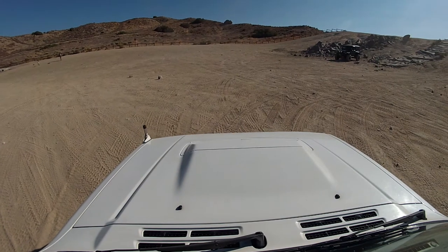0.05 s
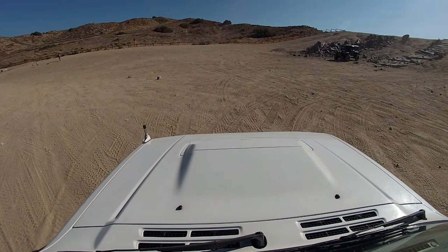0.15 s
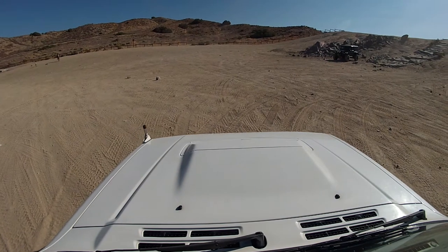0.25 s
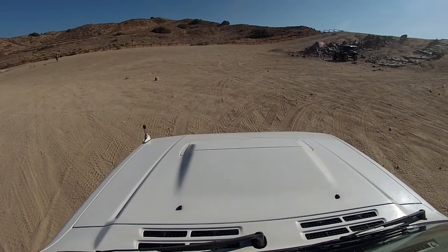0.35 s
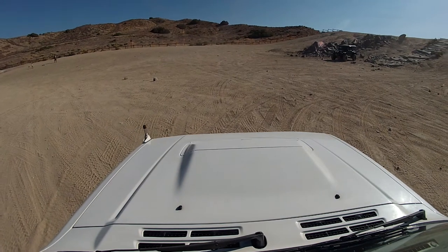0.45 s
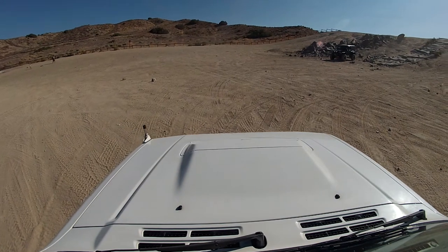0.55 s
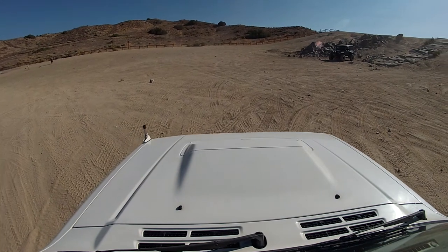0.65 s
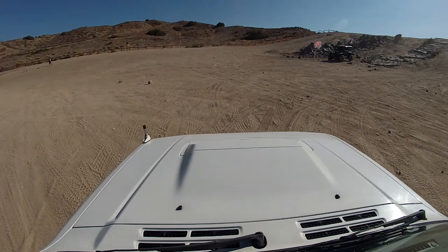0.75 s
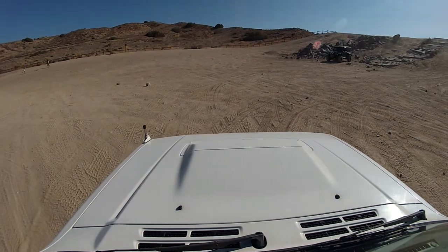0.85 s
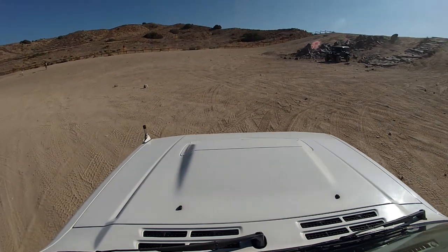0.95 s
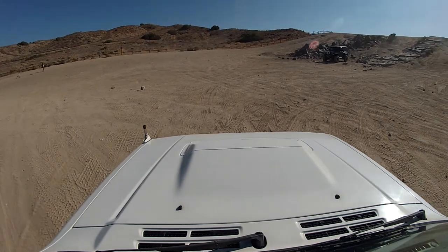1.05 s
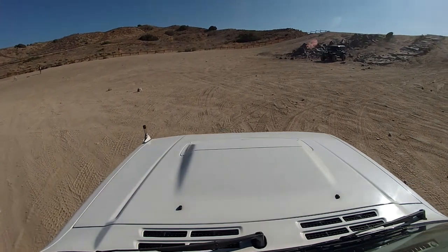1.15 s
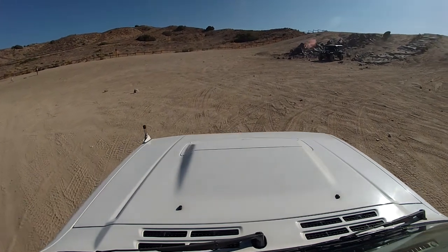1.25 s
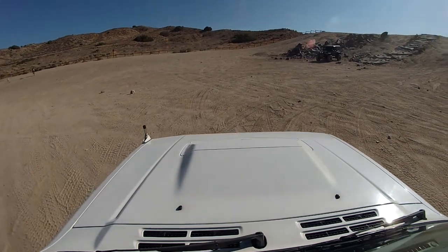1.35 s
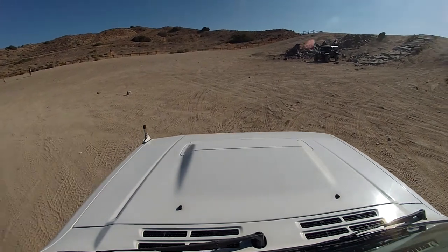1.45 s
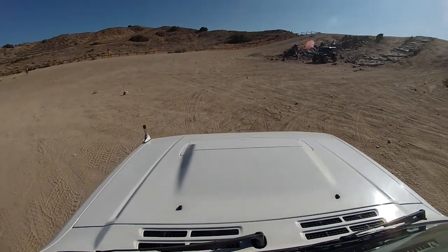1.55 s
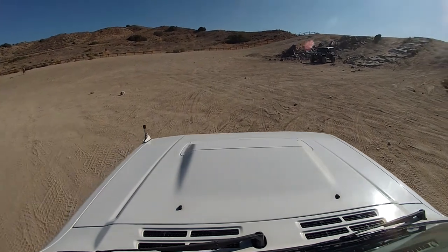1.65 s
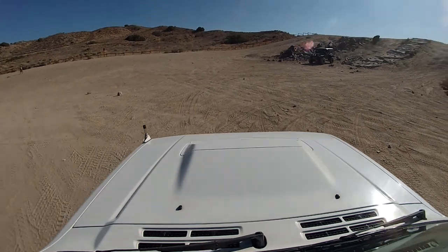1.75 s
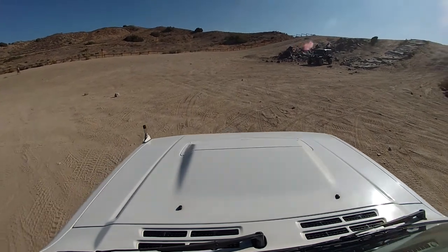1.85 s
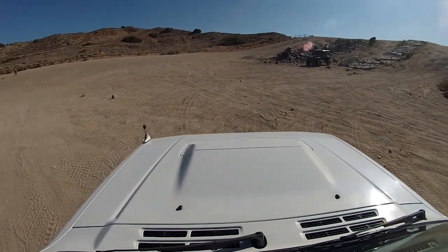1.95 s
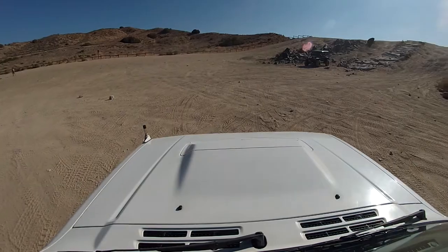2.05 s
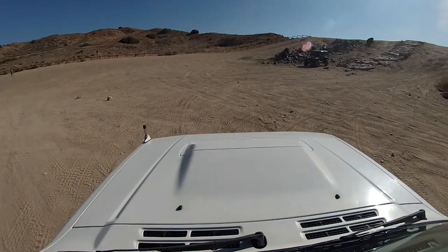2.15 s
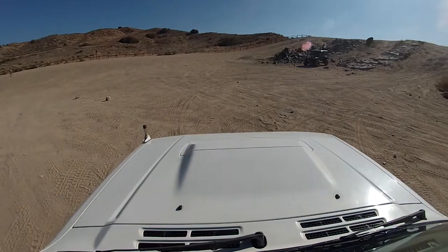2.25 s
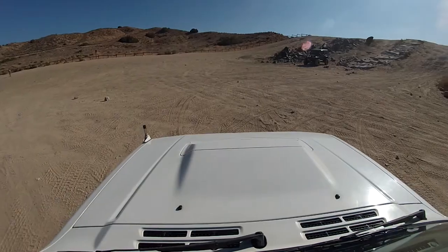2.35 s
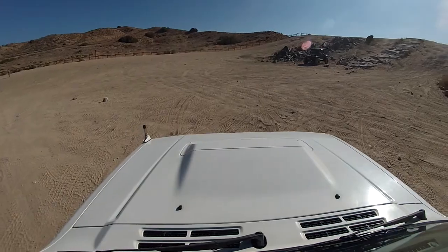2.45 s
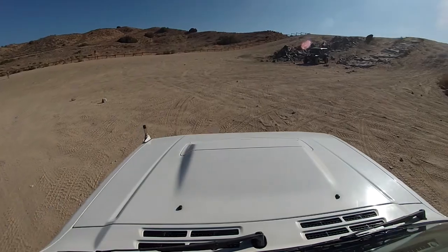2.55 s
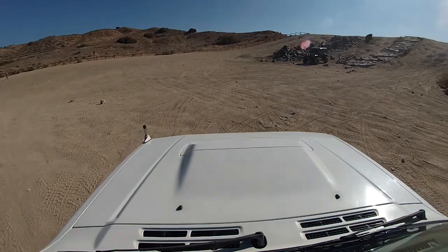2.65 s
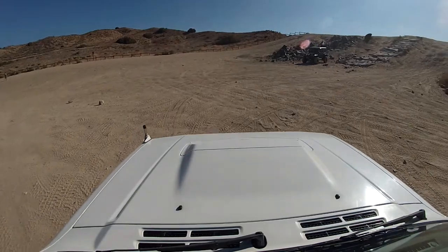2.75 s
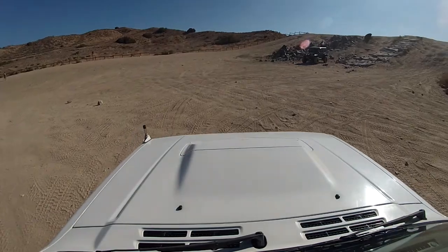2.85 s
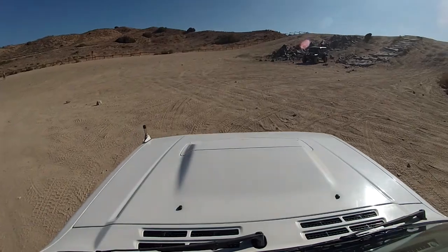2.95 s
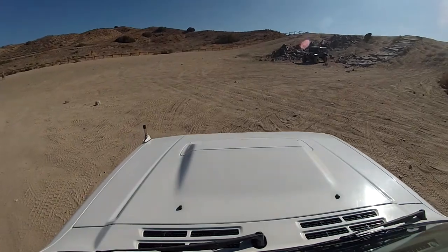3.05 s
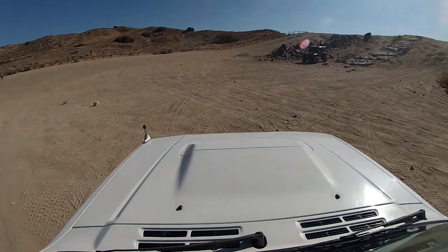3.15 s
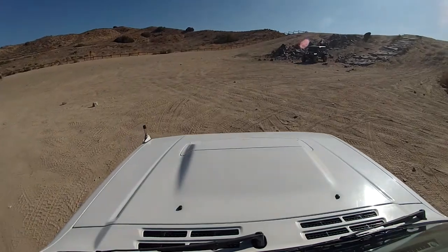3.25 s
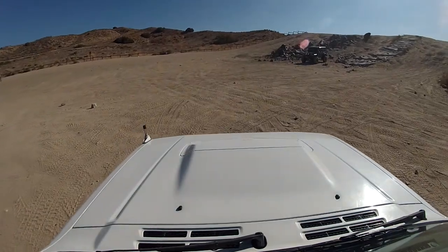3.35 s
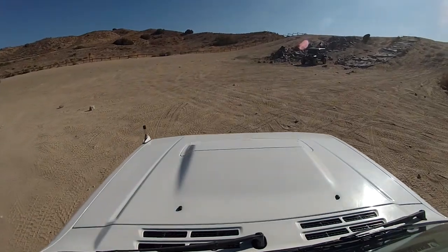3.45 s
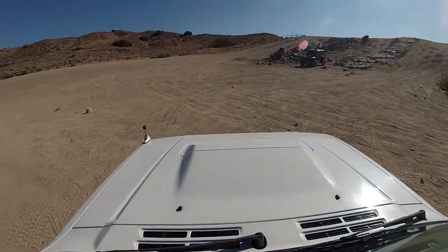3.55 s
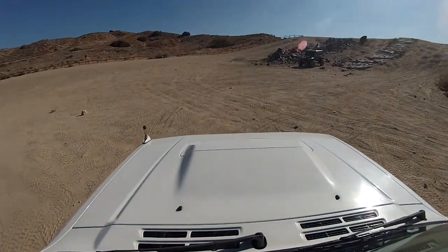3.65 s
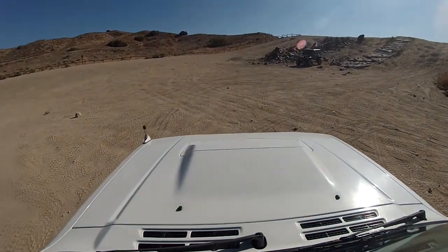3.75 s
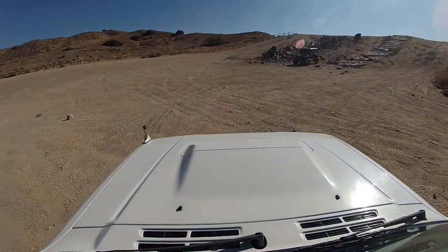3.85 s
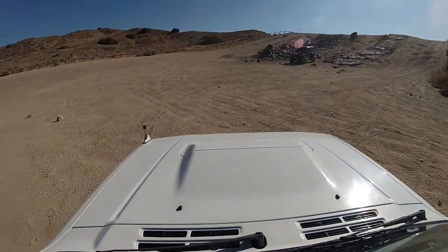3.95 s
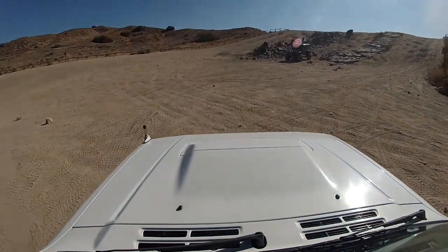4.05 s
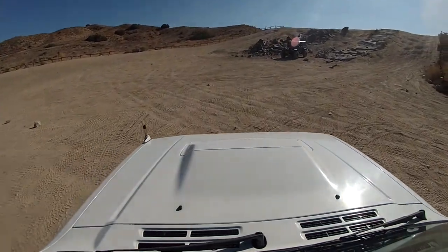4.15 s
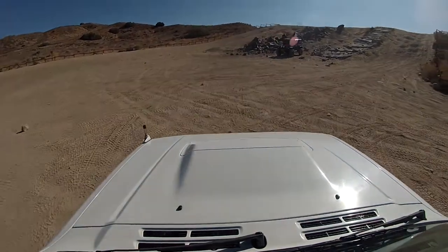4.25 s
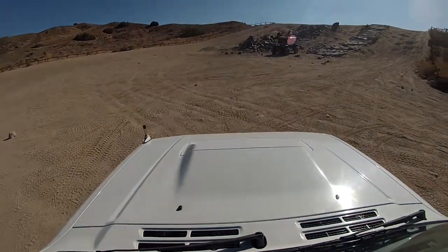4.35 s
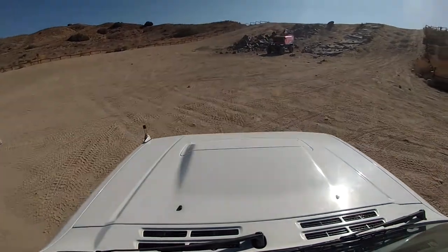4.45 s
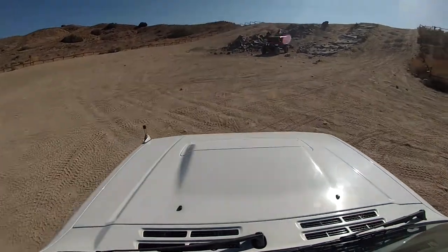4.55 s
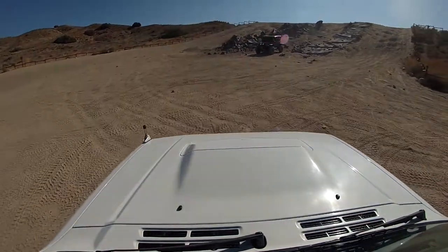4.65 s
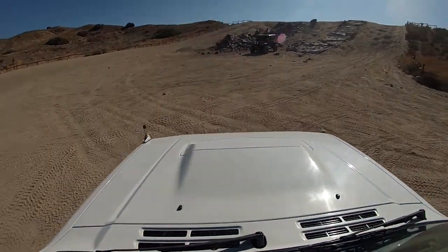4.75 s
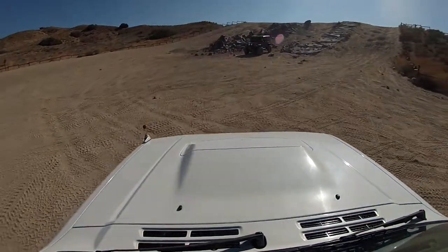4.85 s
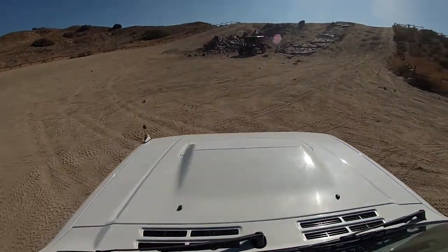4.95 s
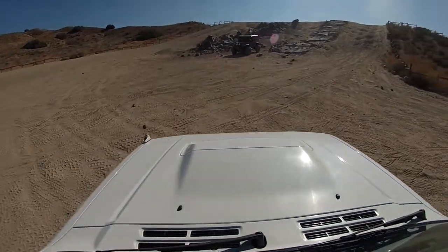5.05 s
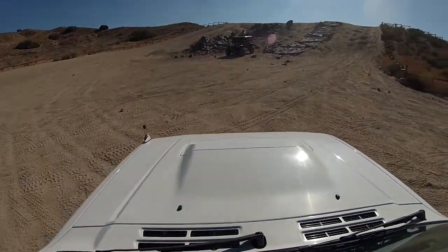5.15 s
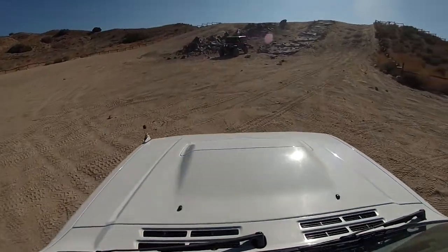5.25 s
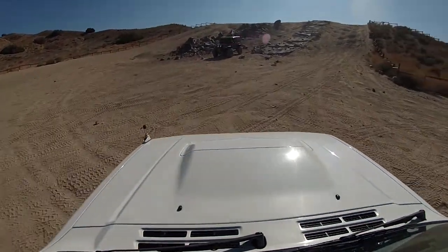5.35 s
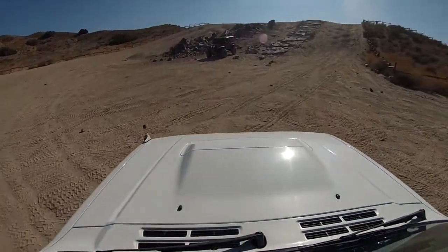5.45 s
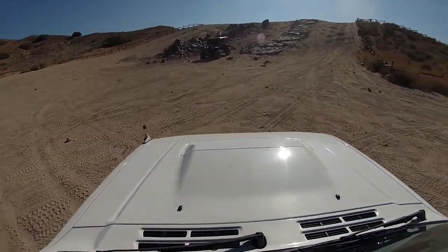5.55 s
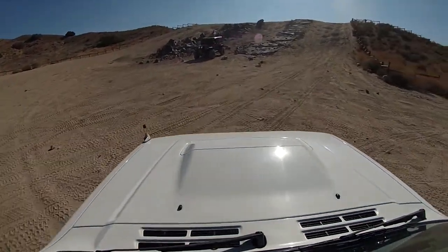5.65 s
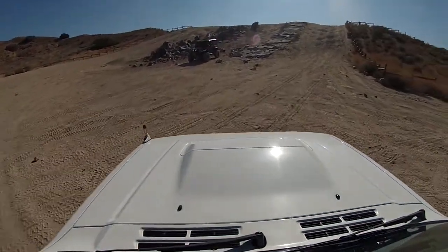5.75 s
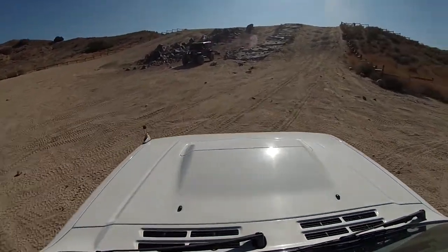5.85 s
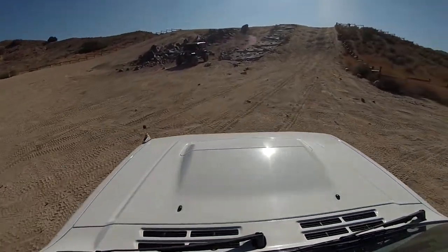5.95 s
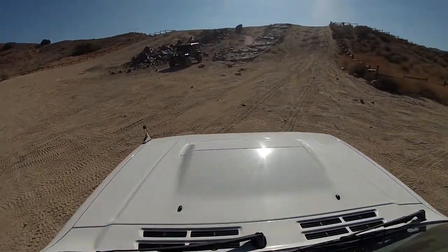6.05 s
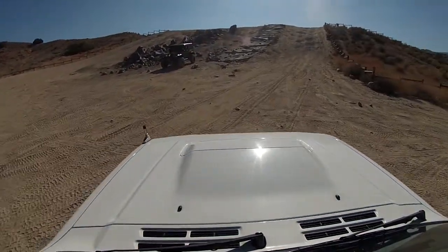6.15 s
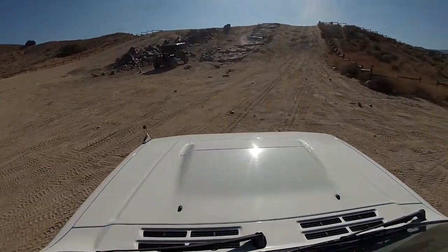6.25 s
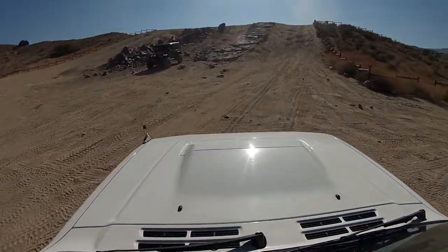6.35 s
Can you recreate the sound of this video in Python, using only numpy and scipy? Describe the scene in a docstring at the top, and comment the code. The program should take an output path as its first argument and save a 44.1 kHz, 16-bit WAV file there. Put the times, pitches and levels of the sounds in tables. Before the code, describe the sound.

Heard from up on a truck outdoors on dirt, a six-cylinder engine idles unevenly and quietly, gives a small blip with a faint intake moan, and settles. Low body thumps and soft tyre rumble follow. Then it revs up sharply with a ticking clack, its exhaust deep and its fan roaring and whining, climbs to a peak, drops in pitch and keeps pulling.

```python
"""A truck engine throbs unevenly at idle, gives one small blip, then revs up and pulls hard.
Around it are a whining, roaring fan, a bright hiss, wind and tyre rumble, thumps, a tick and two thin squeaks.
The six-cylinder exhaust, seven-blade fan and shaking block are sums of tones that follow the engine speed.
Roar, hiss, wind and tyres are coloured noise; the intake moan is a narrow band of noise that rises in pitch.
Squeaks are wavering tones, thumps are short low waves, and the tick is two short bursts of noise."""
import sys
import numpy as np
from scipy import signal
from scipy.fft import rfft, irfft
from scipy.io import wavfile

SR = 44100
rng = np.random.default_rng(int(sys.argv[2]) if len(sys.argv) > 2 else 0)


def store_wav(level_fs):
    """Save 16-bit WAV to argv[1]."""
    pcm = np.round(np.clip(np.atleast_2d(level_fs), -1, 1) * 32767)
    wavfile.write(sys.argv[1], SR, pcm.T.astype(np.int16))


N = 282681
TIME = np.arange(N) / SR  # seconds
BINS = np.fft.rfftfreq(N, 1 / SR)  # Hz

# Engine speed, as the pulse rate of one bank of three cylinders (1.5 pulses per crank turn).
# Each row: time in seconds, rate in Hz.
BANK_RATE = [(0, 16.2), (.57, 16.1), (.89, 23.4), (1.35, 19.8), (1.7, 19.6), (2.75, 15.7), (3.18, 16.1),
             (3.4, 28.1), (3.57, 33.5), (3.76, 42.7), (4.02, 44.1), (4.32, 51.9), (4.63, 56.7),
             (5.42, 62.3), (5.83, 62.7), (6.0, 53.6), (6.21, 44.6), (6.41, 43.9)]
# Load on the engine. Each row: time in seconds, level of the exhaust's firing tone in dB.
FIRING_LEVEL = [(0, -38), (.57, -38.5), (.72, -31.5), (.98, -33), (1.15, -37.5), (1.7, -41.5),
                (2.45, -44.5), (3.13, -39), (3.29, -27), (3.59, -17.5), (3.85, -25), (4.2, -24),
                (4.5, -28.5), (5.45, -24), (5.87, -25), (5.99, -33), (6.3, -23.5), (6.41, -24.5)]
# How unequally the two banks fire. Each row: bank rate in Hz, change of the odd pulse harmonics in dB.
BANK_IMBALANCE = [(16, -6.5), (18, 0), (33, -.5), (45, 1.5), (52, 0.5), (62, -4)]
# Shape of the exhaust pulse. Each row: multiple of the bank rate, relative level in dB.
PULSE_HARMONICS = [(1, -1.5), (3, 3), (4, 0), (5, 1.5), (6, -0.5), (7, -8.5), (8, -4)]
# Exhaust pipe and silencer. Each row: frequency in Hz, gain in dB.
PIPE_GAIN = [(15, -13), (48, -5.5), (60, -4.5), (68, 0), (100, -2), (132, 0), (143, -5), (162, -18),
             (215, -8), (255, -10), (300, -11.5), (600, -24)]
# Resonances of the fan shroud. Each row: frequency in Hz, width in Hz, gain at the centre in dB.
SHROUD_MODES = [(200, 12, 8.5), (264, 25, 4), (473, 50, 2), (568, 74, 8)]
# Colour of the roar at idle and when pulling. Each row: frequency in Hz, relative level in dB per Hz.
ROAR_IDLE_COLOUR = [(82, -48), (140, -24.5), (157, -44), (214, -3.5), (242, -8.5), (286, -2), (318, -10.5),
                    (381, -15), (424, -19.5), (467, -12.5), (648, -18), (873, -15.5), (1180, -23),
                    (1300, -30), (1400, -30), (1820, -74), (3080, -120)]
ROAR_PULL_COLOUR = [(82, -13), (140, -4), (167, -4), (264, -5), (311, -9.5), (428, -12), (524, -10),
                    (623, -15), (706, -10), (816, -12), (925, -13), (1250, -29.5), (1400, -27), (1820, -52),
                    (3080, -120)]
# Panel resonances that colour the roar. Each row: frequency in Hz, width in Hz, gain at the centre in dB.
PANEL_MODES = [(274, 31, 2), (302, 72, -3.5), (388, 117, 3.5), (484, 33, 0.5), (539, 23, 1), (562, 20, 6.5),
               (680, 17, -0.5), (676, 31, 3), (904, 28, 3.5), (1002, 28, 3.5)]
# Colour of the hiss at idle and when pulling. Each row: frequency in Hz, relative level in dB per Hz.
HISS_IDLE_COLOUR = [(710, -1), (1200, -19.5), (1360, -21), (1450, -7.5), (1730, -5), (2510, -15),
                    (2880, -11.5), (3460, -14.5), (3970, -16), (4970, -20.5), (5650, -15), (6350, -23),
                    (12200, -29.5), (13900, -32), (15400, -33)]
HISS_PULL_COLOUR = [(710, -5.5), (1200, -1), (1250, -16), (1640, -5.5), (1780, -4), (2280, -10),
                    (2530, -11.5), (2850, -8), (3350, -12), (3850, -15), (4970, -25), (5650, -21.5),
                    (6490, -32.5), (12500, -39), (15400, -58)]
# Ringing of the engine bay. Each row: frequency in Hz, width in Hz, gain at the centre in dB.
BAY_MODES = [(1780, 43, 2), (2870, 140, 1.5), (3246, 61, 5), (3480, 120, 8), (3900, 470, -5),
             (5670, 270, 2), (11550, 700, -2.5), (14800, 3000, -4)]
# Colour of the wind. Each row: frequency in Hz, relative level in dB per Hz.
WIND_COLOUR = [(4, -25), (12, -3), (22, 0), (32, -4), (50, -10), (80, -15), (130, -18), (300, -35),
               (900, -70)]
# Gusts on the microphone. Each row: peak time in seconds, rise (and fall) in seconds, peak level in dB.
GUSTS = [(0.05, 0.16, -34.5), (.8, 0.48, -44), (3.1, 0.59, -35.5), (3.58, 0.18, -36), (5.6, 0.37, -31.5),
         (6.3, 0.16, -33)]
# Tyres drumming on rough ground. Each row: peak time in seconds, rise (and fall) in seconds, peak level in dB.
ROUGH_GROUND = [(2.4, 0.84, -39.5), (5.2, 0.2, -28)]
# Thin metallic squeaks. Each row: peak time in seconds, rise in seconds, fall in seconds,
# pitch at the peak in Hz, glide in Hz per second, level in dB.
SQUEAKS = [(.45, .09, .1, 1495, -700, -62), (4.2, 0.17, 0.066, 8868, -1.5, -58)]
# The body rocks on a bump. Each row: time in seconds, pitch in Hz, level in dB, length in seconds.
BODY_THUMPS = [(1.845, 25, -24, 0.11), (2.155, 28, -21.5, 0.026), (2.29, 39.7, -32, 0.016),
               (2.803, 30.4, -29.5, 0.07)]
# Sharp ticks. Each row: time in seconds, peak level in dB before it is halved.
TICKS = [(3.592, -43)]
# Colours of the tyres, the dull clack and the sharp snap. Each row: frequency in Hz, relative level in dB.
TYRE_COLOUR = [(15, -26), (35, 0.5), (60, 5.0), (100, 0.5), (140, -5.5), (200, -6.5), (500, -62.0)]
CLACK_COLOUR = [(300, -17), (900, 8), (2000, -1), (4500, -15.0), (7000, -32), (16000, -34)]
SNAP_COLOUR = [(500, -10), (3000, -4), (8000, -10), (15000, -11)]

# bank rates between which the noise colours move from idling to pulling
IDLE_HZ, FULL_HZ = 19.2, 61.04
# the uneven throb under the firing tone: its base level at low load, and the share of the load it follows
LOW_LOAD_DB, THROB_DB, THROB_SHARE = -41, -41.5, 0.63
# level at full speed (dB), growth with each doubling of speed (dB), and the part that always stays (dB)
ROAR_DB, ROAR_GROWTH_DB, ROAR_REST_DB = -26, 11, -50
HISS_DB, HISS_GROWTH_DB, HISS_REST_DB = -40.5, 9.5, -57.5
# fan blade tone and its octave at full speed, before the shroud; growth with each doubling of speed
BLADE_DB, OCTAVE_DB, BLADE_GROWTH_DB, OCTAVE_GROWTH_DB = -37.5, -40, 12.5, 16
BREEZE_DB = -42
# intake moan: start (s), rise (s), fade (dB per second), level before the fade (dB)
MOAN_AT, MOAN_RISE_S, MOAN_FADE_DB_PER_S, MOAN_DB = .68, .09, 24, -43.5
MOAN_SHUT_HZ, MOAN_OPEN_HZ, MOAN_OPEN_S = 188.5, 370, .2
EDGE_HZ = 15350  # top of the treble


def gain_of(db):
    """Turns decibels into amplitude."""
    return 10 ** (np.asarray(db) / 20)


def evened(x):
    """Scales a sound to an average (rms) level of 1."""
    return x / np.sqrt(np.mean(x ** 2) + 1e-20)


def curve(rows):
    """Joins the points of a (time, value) table into a value at every sample."""
    seconds, values = np.transpose(rows)
    return np.interp(TIME, seconds, values)


def read(points, hz):
    """Reads a (frequency, value) table at any frequency, on a logarithmic frequency scale."""
    table_hz, values = np.transpose(points)
    return np.interp(np.log(hz + 1), np.log(table_hz + 1), values)


def coloured(x, points, extra_db=0):
    """Filters x by a table of levels, then scales it to rms 1."""
    gain = gain_of(read(points, BINS) + extra_db)
    return evened(irfft(rfft(x) * gain, N))


def noise():
    """White noise, with equal strength at all frequencies."""
    return rng.standard_normal(N)


def drift(hz):
    """Random wandering, mostly slower than the given rate, at rms 1."""
    return evened(irfft(rfft(noise()) / (1 + (BINS / hz) ** 4), N))


def ringing_db(modes, at_hz):
    """Adds up the gain in dB of a set of resonances at the given frequencies."""
    return sum(db / (1 + (2 * (at_hz - hz) / width) ** 2) for hz, width, db in modes)


def by_speed(octaves, full_db, growth_db, rest_db):
    """Amplitude of a noise that grows with speed above a resting level."""
    return np.hypot(gain_of(full_db + growth_db * octaves), gain_of(rest_db))


def by_effort(drive, effort, idle, pull, extra_db=0):
    """Blends a noise from its idling colour to its pulling colour as effort goes from 0 to 1."""
    idling = coloured(drive, idle, extra_db)
    pulling = coloured(drive, pull, extra_db)
    return evened((1 - effort) * idling + effort * pulling)


def swell(s, rise_s, fall_s):
    """A bell-shaped rise and fall that peaks at time s."""
    return np.exp(-((TIME - s) / np.where(TIME < s, rise_s, fall_s)) ** 2)


def with_swells(steady, rows):
    """Adds swells to a steady amplitude, as powers."""
    power = sum((gain_of(db) * swell(s, length, length)) ** 2 for s, length, db in rows)
    return np.sqrt(steady ** 2 + power)


def machinery(crank, locked, beat, size=4096):
    """Rushing noise that swells at each firing, plus a rattle that repeats every two crank turns."""
    place = crank / 2 % 1 * size
    pattern = np.interp(place, np.arange(size), rng.standard_normal(size))
    # scaled by how fast the pattern is played
    rattle = pattern * np.sqrt(np.gradient(crank) * size / 2)
    firing_swell = 1 + beat * np.cos(6 * np.pi * crank)  # three firings per crank turn
    return (noise() + locked * rattle) * firing_swell


def exhaust(bank_hz, turns, load_db):
    """Two banks fire in turn; their pulse harmonics pass a silencer that shuts off steeply."""
    flutter, rough = .13, .14  # random changes in amplitude, as shares
    odd_db = read(BANK_IMBALANCE, bank_hz)
    throb_db = THROB_DB + THROB_SHARE * (load_db - LOW_LOAD_DB)
    # the firing tone is at twice the rate of one bank
    out = gain_of(load_db) * (1 + flutter * drift(15)) * np.cos(4 * np.pi * turns)
    for k, db in PULSE_HARMONICS:
        harmonic_db = throb_db + db + k % 2 * odd_db + read(PIPE_GAIN, k * bank_hz)
        level = gain_of(harmonic_db) * (1 + rough * drift(8.7))
        smear = np.pi * k * k / 4  # the silencer spreads each pulse over the whole cycle
        out += level * np.cos(2 * np.pi * k * turns - smear)
    return np.sqrt(2) * out


def shake(crank, octaves, full_db=-40, growth_db=12):
    """The pistons shake the block twice in each crank turn, harder with speed."""
    rough = .4
    level = gain_of(full_db + growth_db * octaves) * (1 + rough * drift(6.8))
    return np.sqrt(2) * level * np.sin(4 * np.pi * crank)


def hiss(crank, effort, octaves):
    """Valve train and belts make a bright noise that rings in the engine bay."""
    drive = machinery(crank, locked=0.25, beat=0.063)
    bay_db = ringing_db(BAY_MODES, BINS)
    sound = by_effort(drive, np.sqrt(effort), HISS_IDLE_COLOUR, HISS_PULL_COLOUR, bay_db)
    return by_speed(octaves, HISS_DB, HISS_GROWTH_DB, HISS_REST_DB) * sound


def fan_tones(crank, octaves):
    """Seven blades chop the air, louder with speed; turbulence roughens the tone and its octave."""
    blades = 7.025 * crank  # the fan turns slightly faster than the crank
    rough, wobble = .25, .15  # share of amplitude, and radians
    blade_hz = np.gradient(blades) * SR
    out = np.zeros(N)
    for k, db, growth_db in [(1, BLADE_DB, BLADE_GROWTH_DB), (2, OCTAVE_DB, OCTAVE_GROWTH_DB)]:
        level = gain_of(db + growth_db * octaves + ringing_db(SHROUD_MODES, k * blade_hz))
        level = level * (1 + rough * drift(6.5))
        out += level * np.sin(2 * np.pi * k * blades + wobble * drift(7.4))
    return np.sqrt(2) * out


def roar(crank, effort, octaves):
    """Fan wash and block noise from under the bonnet, coloured by panels and louder with speed."""
    drive = machinery(crank, locked=.8, beat=.15)
    panel_db = ringing_db(PANEL_MODES, BINS)
    sound = by_effort(drive, np.sqrt(effort), ROAR_IDLE_COLOUR, ROAR_PULL_COLOUR, panel_db)
    return by_speed(octaves, ROAR_DB, ROAR_GROWTH_DB, ROAR_REST_DB) * sound


def rumble(effort, crawl_db=-46, tyres_db=-34):
    """A breeze with gusts on the microphone, and tyres that drum louder with speed and on rough ground."""
    wind = with_swells(gain_of(BREEZE_DB), GUSTS) * coloured(noise(), WIND_COLOUR)
    rolling = gain_of(crawl_db) + gain_of(tyres_db) * effort
    tyres = with_swells(rolling, ROUGH_GROUND) * coloured(noise(), TYRE_COLOUR)
    return wind + tyres


def squeaks(waver_hz=8, shimmer_db=2.0):
    """Thin metallic tones swell, waver in pitch and loudness, and die away."""
    out = np.zeros(N)
    for s, rise_s, fall_s, hz, glide, db in SQUEAKS:
        pitch = hz + glide * (TIME - s) + waver_hz * drift(60)
        phase = 2 * np.pi * np.cumsum(pitch) / SR
        level = swell(s, rise_s, fall_s) * gain_of(db + shimmer_db * drift(30))
        out += level * np.sin(phase)
    return np.sqrt(2) * out


def intake(spread_hz=22):
    """A fuzzy band of air noise that rises in pitch as the throttle cracks open, then fades."""
    age = np.maximum(TIME - MOAN_AT, 0)
    opening = np.minimum(age / MOAN_OPEN_S, 1) ** 2
    hz = MOAN_SHUT_HZ + (MOAN_OPEN_HZ - MOAN_SHUT_HZ) * opening
    level = np.minimum(age / MOAN_RISE_S, 1) * gain_of(MOAN_DB - MOAN_FADE_DB_PER_S * age)
    phase = 2 * np.pi * np.cumsum(hz) / SR
    # two random drifts on a cosine and a sine make a noise band around the pitch
    return level * (drift(spread_hz) * np.cos(phase) + drift(spread_hz) * np.sin(phase))


def knocks(clack_db=-38, clack_s=0.015, snap_t60=0.0037):
    """Soft low thumps of the body, and a dull clack with a sharp tick at its heart."""
    out = np.zeros(N)
    for s, hz, db, length in BODY_THUMPS:
        bell = np.exp(-(2 * (TIME - s) / length) ** 2)
        out -= gain_of(db) * bell * np.cos(2 * np.pi * hz * (TIME - s))
    clack = coloured(noise(), CLACK_COLOUR)
    snap = coloured(noise(), SNAP_COLOUR)
    for s, db in TICKS:
        distance = abs(TIME - s)
        out += gain_of(clack_db) * np.exp(-distance / clack_s) * clack
        # the snap starts at once and falls by 60 dB in snap_t60 seconds
        out += (TIME > s) * gain_of(db - 60 * distance / snap_t60) * snap / 2
    return out


def scene():
    """Engine speed drives the engine, fan and tyres; load sets the strength of the exhaust."""
    bank_hz = curve(BANK_RATE)
    load_db = curve(FIRING_LEVEL)
    turns = np.cumsum(bank_hz) / SR  # pulses of one bank so far
    crank = turns * 2 / 3  # crank turns so far
    effort = np.clip((bank_hz - IDLE_HZ) / (FULL_HZ - IDLE_HZ), 0, 1)
    octaves = np.log2(bank_hz / FULL_HZ)  # doublings of speed, 0 at full speed
    engine = exhaust(bank_hz, turns, load_db) + shake(crank, octaves) + hiss(crank, effort, octaves)
    fan = fan_tones(crank, octaves) + roar(crank, effort, octaves)
    return (engine + fan + rumble(effort) + squeaks() + intake() + knocks())[None]


def record(dry):
    """Softens the two ends and cuts the treble above EDGE_HZ."""
    ends = signal.windows.tukey(N, .001)
    low_pass = signal.firwin(511, EDGE_HZ, window=("kaiser", 9), fs=SR)
    return signal.oaconvolve(dry * ends, low_pass[None], "same")


dry = scene()
out = record(dry)
store_wav(out)
```